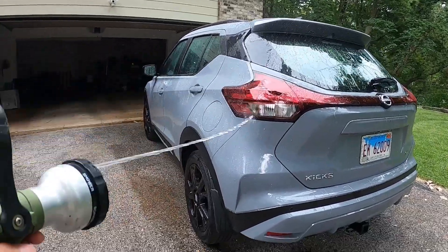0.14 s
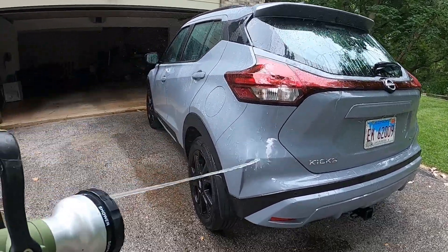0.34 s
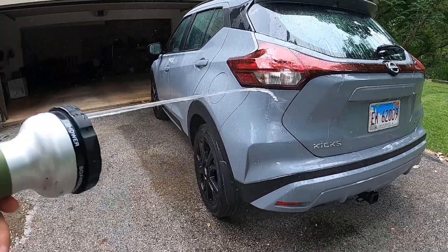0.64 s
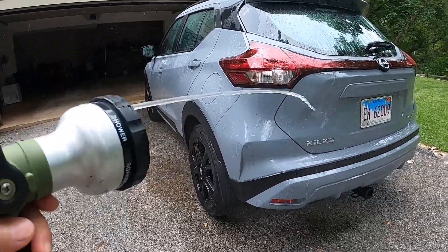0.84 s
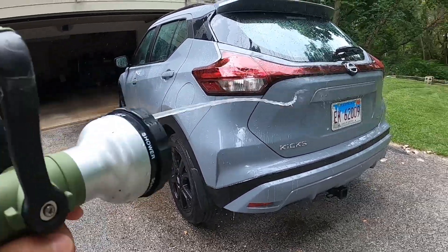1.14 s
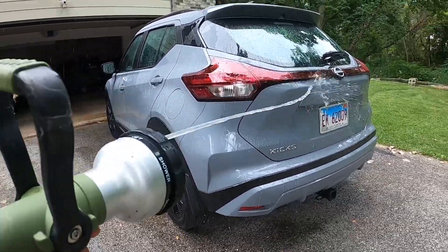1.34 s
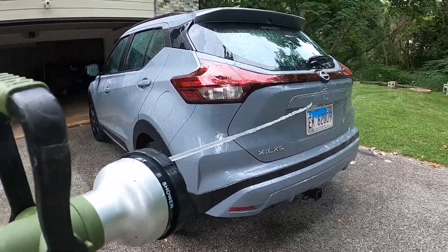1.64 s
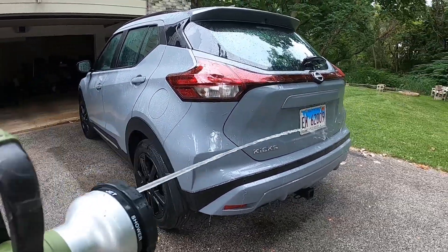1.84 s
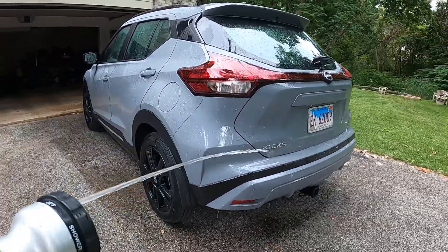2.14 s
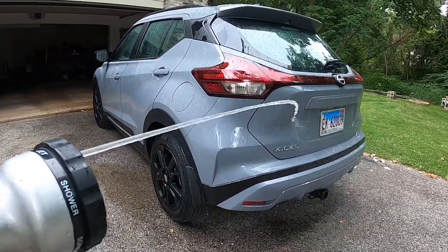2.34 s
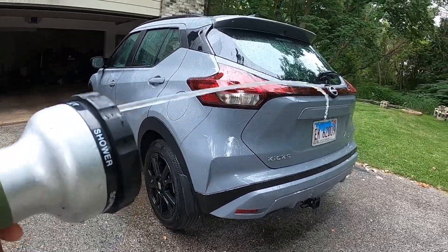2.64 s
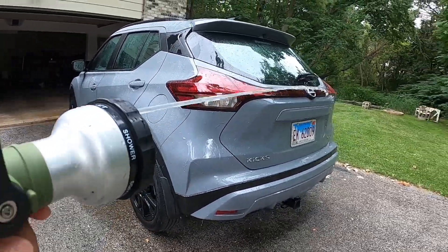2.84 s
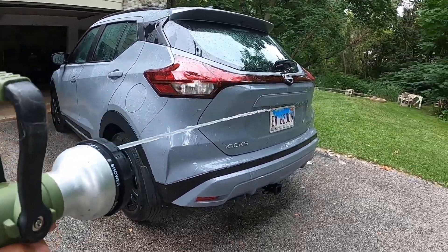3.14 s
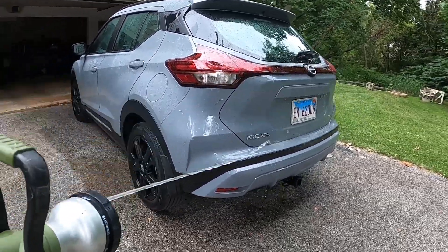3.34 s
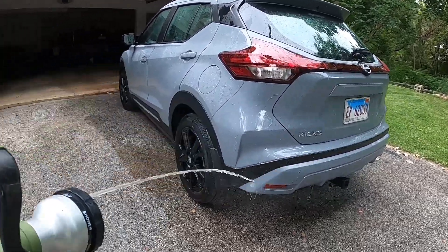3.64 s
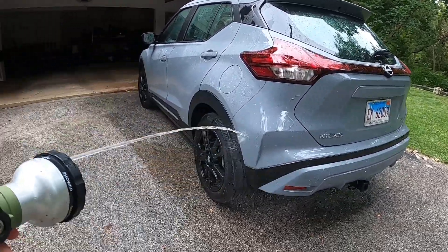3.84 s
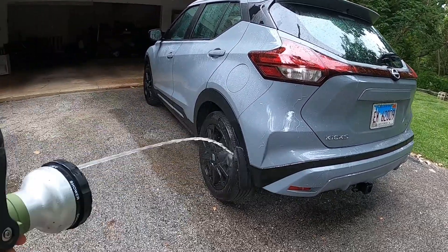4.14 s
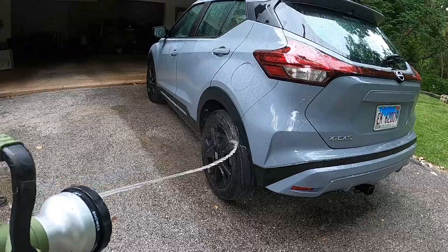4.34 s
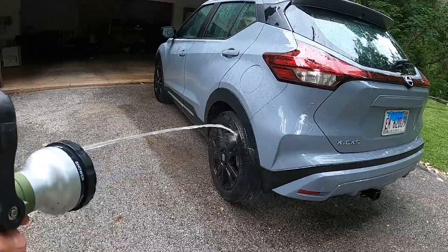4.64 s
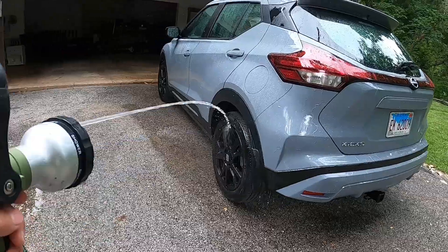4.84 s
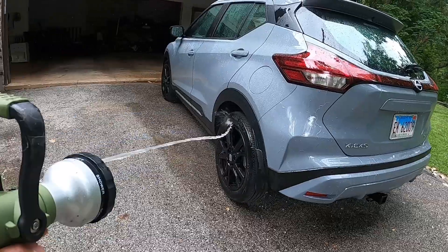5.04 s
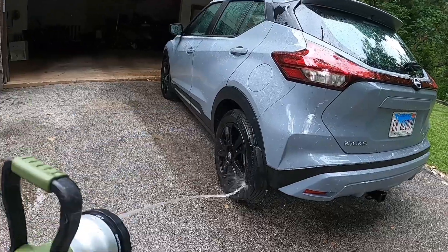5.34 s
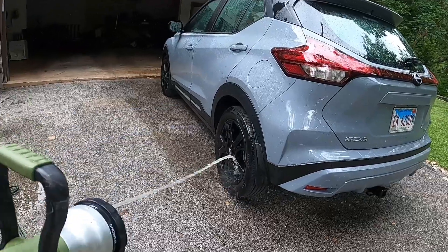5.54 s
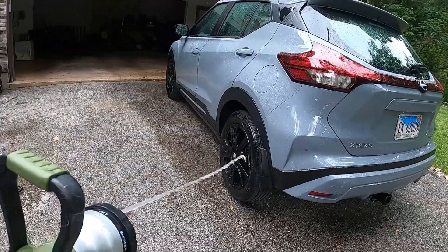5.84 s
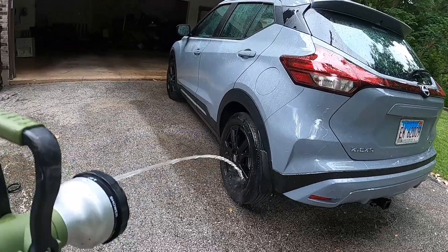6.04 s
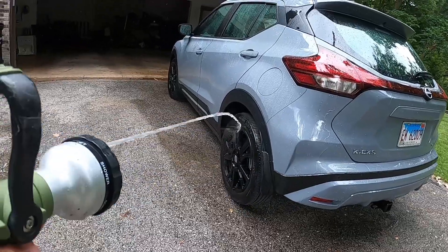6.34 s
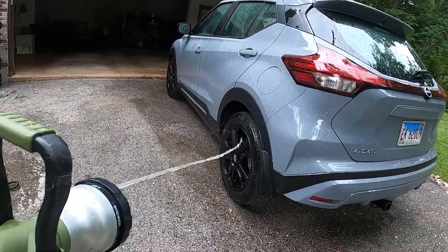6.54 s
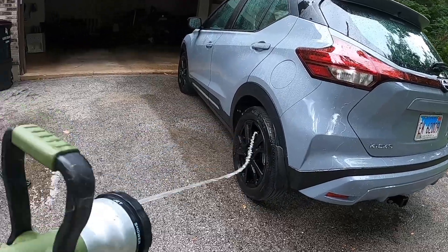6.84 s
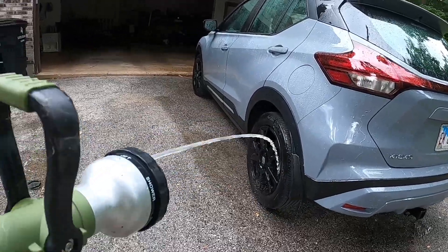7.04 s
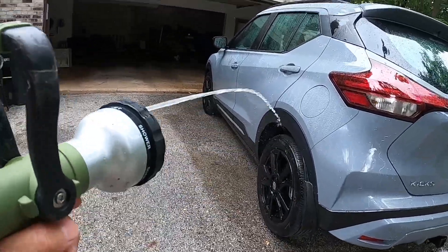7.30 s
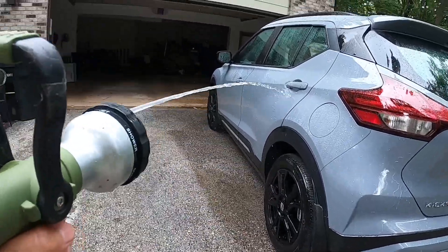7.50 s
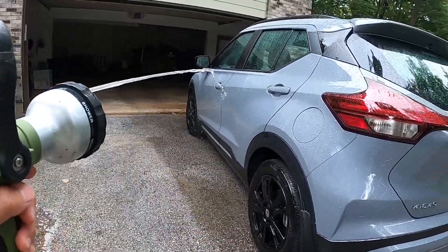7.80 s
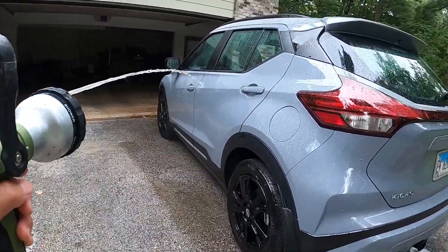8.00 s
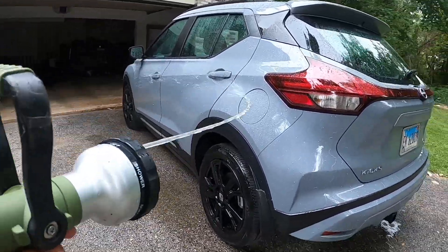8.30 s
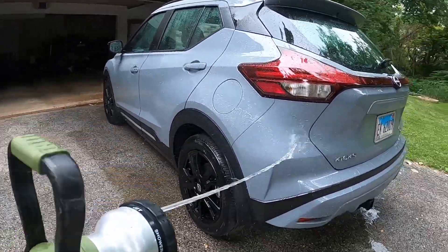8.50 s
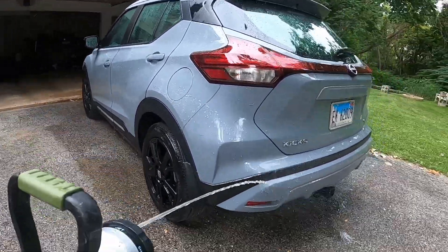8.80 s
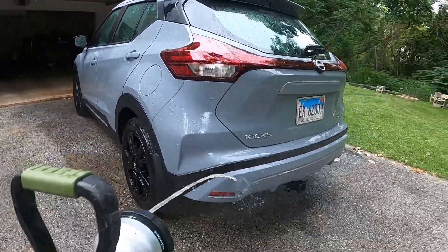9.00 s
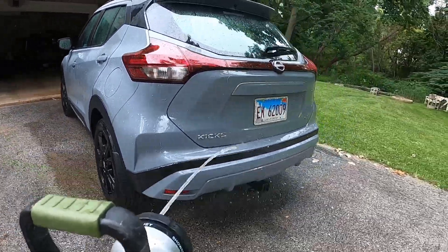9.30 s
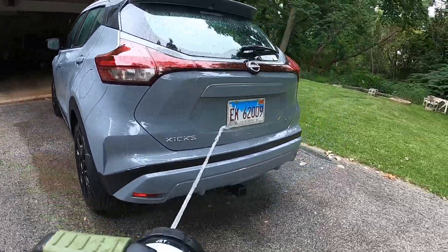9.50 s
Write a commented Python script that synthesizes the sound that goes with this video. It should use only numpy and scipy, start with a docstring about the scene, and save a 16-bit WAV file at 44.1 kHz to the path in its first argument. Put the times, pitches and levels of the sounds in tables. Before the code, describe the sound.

Close hose nozzle hisses steadily while water drums in short passes across car bodywork, then patters sharply on tyre and driveway.

```python
"""Hosing down a parked car

A thin hose jet sweeps over a parked car, a few metres from a camera's two microphone ports.
Random drop impacts ring the panel modes; the splash is a crackle plus single bursts echoed by the drive.
The nozzle hisses in its resonances, and shaped noise makes a low outdoor rumble underneath.
The camera's gain control ducks around loud peaks and creeps back up."""
import sys
import numpy as np
from scipy import signal
from scipy.fft import rfft, irfft, next_fast_len
from scipy.io import wavfile
from scipy.ndimage import uniform_filter1d, minimum_filter1d, map_coordinates

SR = 44100
rng = np.random.default_rng(int(sys.argv[2]) if len(sys.argv) > 2 else 0)


def output_pcm(signal):
    """Save a mono or channel-first signal as 16-bit PCM at the path in sys.argv[1].

    Samples are clipped to [-1, 1] before scaling.
    """
    pcm = np.clip(np.atleast_2d(signal).T, -1, 1) * 32767
    wavfile.write(sys.argv[1], SR, np.round(pcm).astype(np.int16))


N = 426006  # length in samples


def amp(db):
    """Decibels to a linear factor."""
    return 10 ** (np.asarray(db) / 20)


def unit(x):
    """Scale to rms 1."""
    return x / np.sqrt(np.mean(x ** 2) + 1e-20)


def along(points, hz):
    """Read (f/Hz, value) points on a log frequency axis."""
    f, v = np.transpose(points)
    return np.interp(np.log(hz + 1), np.log(f + 1), v)


def curves(rows):
    """One value per sample for each column after the time."""
    s, *cols = np.transpose(rows)
    t = np.arange(N) / SR
    return [np.interp(t, s, c) for c in cols]


def wobble(rate):
    """A smooth random curve, rate knots a second."""
    knots = rng.standard_normal(int(N * rate / SR) + 4)
    return map_coordinates(knots, [np.arange(N) * rate / SR])


def filtered(x, response):
    """Shape the spectrum of x by a (possibly complex) response of frequency."""
    m = next_fast_len(N + 8192)
    return irfft(rfft(x, m) * response(np.fft.rfftfreq(m, 1 / SR)), m)[..., :N]


def patter(per_s, scatter_db):
    """Random impacts, rms 1: two rows share moments and scattered strengths, each hit with its own factor."""
    strength = amp(scatter_db * rng.exponential(size=N))
    hit = (rng.random(N) < per_s / SR) * strength
    return unit(hit * rng.standard_normal((2, N)))


def patches(shape, bins, frames):
    """A random field of rms 1, smoothed over frequency bins and time frames."""
    over_bins = uniform_filter1d(rng.standard_normal(shape), size=bins, axis=0)
    return unit(uniform_filter1d(over_bins, size=frames, axis=1))


def patchy(x, depth_db):
    """Random gain in patches of several hundred Hz by some twenty ms."""
    z = signal.stft(x, nperseg=256)[2]
    gain = amp(depth_db * patches(z.shape[1:], bins=5, frames=8))
    return signal.istft(z * gain, nperseg=256)[1][:, :N]


# The jet crossing a panel: [start t/s, length t/s, soft modes level/dB, low modes level/dB,
# high modes level/dB, splash level/dB, swell from start to end level/dB, favoured pitch f/Hz]
PANEL_PASSES = [(0, 0.13, -30, -28, -27, -21.5, 7, 930), (0.146, 0.15, -30, -22.5, -21, -20, 0, 890),
                (0.331, 0.22, -20.5, -12, -6, -12.5, -1, 790), (0.578, 0.03, -18, -18, -8, -24, 2, 910),
                (0.616, 0.063, -24, -13, -7, -16.5, 1.5, 650),
                (0.707, 0.046, -20, -18, -4.5, -12.5, -2, 740), (0.78, 0.12, -23, -7.5, -6.5, -12, 1, 630),
                (0.931, 0.12, -24.5, -12, -8, -15, -3, 940), (1.079, 0.044, -25, -12, -6, -17, -3, 695),
                (1.13, 0.047, -33, -22, -10.5, -17.5, -7.5, 940),
                (1.213, 0.078, -32, -31, -24, -16, 6, 960), (1.327, 0.13, -33, -13.5, -9, -16, -6.5, 840),
                (1.545, 0.016, -32, -20, -15.5, -18, 9, 925),
                (1.622, 0.14, -27, -17.5, -19.5, -20.5, -1, 890),
                (1.73, 0.074, -25, -17.5, -13.5, -19.5, 2, 820),
                (1.859, 0.099, -36, -16, -17, -15.5, 11.5, 930),
                (1.995, 0.22, -21.5, -21, -19.5, -27, 0, 865),
                (2.183, 0.15, -24, -16.5, -9.5, -14.5, -1, 990),
                (2.388, 0.15, -23, -17, -13, -14.5, 4.5, 926),
                (2.599, 0.09, -23.5, -19, -20.5, -20.5, -4, 860),
                (2.727, 0.19, -27, -19.5, -22.5, -17.5, 0.5, 826),
                (3.194, 0.077, -24, -18, -10, -18, 1, 1020), (3.329, 0.12, -16, -12, -12, -12, 1, 840),
                (3.462, 0.18, -14.5, -11, -14, -18.5, -8.5, 860),
                (3.656, 0.26, -15.5, -16.5, -8.5, -10.5, 0.5, 1140),
                (3.919, 0.1, -17, -6, -9, -18.5, -1.5, 870), (4.047, 0.091, -19.5, -14, -10, -19, -6, 930),
                (4.283, 0.11, -35.5, -34, -18, -24, 2, 1900), (4.557, 0.031, -15, -24, -3, -16, 1, 1040),
                (4.6, 0.075, -12, -10, -2.5, -9, 2.5, 1140),
                (5.165, 0.057, -11.5, -23.5, -23, -21.5, 2, 1020),
                (7.507, 0.13, -27, -25, -24.5, -23, -7.5, 890),
                (7.638, 0.075, -41, -18.5, -21.5, -31.5, 3, 860),
                (7.785, 0.26, -20.5, -20.5, -23, -39, -2, 910),
                (8.126, 0.099, -23, -29, -27, -21.5, -9, 1070),
                (8.48, 0.047, -17, -11.5, -10, -13, -1, 1030), (8.532, 0.058, -17, -11, -9.5, -10, 5, 1660),
                (8.605, 0.08, -16, -11, -1.5, -8, -1, 940), (8.69, 0.043, -20, -7, -4.5, -14, -2, 630),
                (8.755, 0.059, -23, -14, -11.5, -19, 5, 960), (8.866, 0.11, -26, -20, -17.5, -14, -3, 950),
                (8.96, 0.12, -18.5, -18, -12.5, -12.5, 0, 980),
                (9.072, 0.16, -22, -14, -13.5, -12, -4.5, 1210),
                (9.268, 0.2, -18.5, -12, -17.5, -19, 6, 840), (9.466, 0.13, -16, -11, -16.5, -17, -5, 780),
                (9.628, 0.067, -17, -17, -15, -17, -9, 1015)]
# Splash on wheel and drive between passes: [t/s, level/dB]
SPRAY_LEVEL = [(0, -21.5), (1.5, -22), (3, -21.5), (4.2, -24), (4.5, -21.5), (4.8, -25), (6.5, -29),
               (7.3, -26), (8.4, -22), (9.66, -19)]
# Soft, low and high modes between passes, relative to that splash: [level/dB]
OFF_PANEL_LEVELS = [-7.5, -10, -12]
ATTACK_S, RELEASE_S = 0.012, 0.026  # the jet meeting and leaving a panel


def passes():
    """Levels (dB) of three mode groups and splash, and favoured pitch: each pass rises, holds and fades."""
    t = np.arange(0, N / SR, .002)
    start, length, *level_db, swell_db, spot_hz = np.transpose(PANEL_PASSES)[:, :, None]
    rise = np.clip(1 + (t - start) / ATTACK_S, 0, 1)
    fade = np.exp(-np.maximum(t - start - length, 0) / RELEASE_S)
    swell = amp(swell_db * np.clip((t - start) / length - .5, -.5, .5))
    shape = rise * fade * swell
    between_db = np.interp(t, *np.transpose(SPRAY_LEVEL)) + np.array([*OFF_PANEL_LEVELS, 0])[:, None]
    levels = []
    for on_db, off_db in zip(level_db, between_db):
        loudest = (shape * amp(on_db)).max(axis=0)
        levels.append(20 * np.log10(np.maximum(loudest, amp(off_db))))
    spot = spot_hz[shape.argmax(axis=0), 0]
    return curves(np.column_stack([t, *levels, spot]))


def drifting(x, depth_s):
    """Reading slightly ahead or behind bends the pitch up and down by a few percent."""
    at = np.arange(N) + depth_s * SR * (wobble(9) + 5 * wobble(2.5))
    return np.array([np.interp(at, np.arange(N), row) for row in x])


# Body panel resonances in soft, low and high groups: [f/Hz, width f/Hz, level/dB]
PANEL_MODES = [
    [(167, 146, 0.5), (230.5, 102, 2)],
    [(294.7, 44, -2.5), (348.2, 50, -0.5), (397.5, 44, 1), (458.6, 110, 1.5)],
    [(624.4, 106, 1.5), (744.4, 117, -2), (916.3, 93, -0.5), (1048.5, 107, -1), (1201, 113, -3.5),
     (1373, 84, -2.5), (1645, 250, 0), (1870, 230, -3), (2570, 350, -10)],
]


def panels():
    """Drops drive the panel modes; as the jet wanders each swells, fades and is detuned by the water film."""
    drive = patter(2500, scatter_db=-1.0) * amp(0.29 * wobble(45))
    *levels_db, _, spot_hz = passes()
    out = 0
    # only the high group loses modes far from the struck spot's pitch
    for level_db, modes, focus_db in zip(levels_db, PANEL_MODES, [0, 0, 11]):
        ring, power = 0, 0
        for hz, width_hz, db in modes:
            # two equal resonators in series
            mode = unit(filtered(drive, lambda f: (
                1j * f * width_hz / (hz * hz - f * f + 1j * f * width_hz)) ** 2))
            off_spot = np.tanh(3 * np.log2(hz / spot_hz) ** 2)
            share = amp(db + 3.9 * wobble(18) - focus_db * off_spot)
            ring = ring + share * drifting(mode, depth_s=0.000908)
            power = power + share ** 2
        out = out + amp(level_db) * ring / np.sqrt(power)
    return out


def tinted(x, spot_hz):
    """The struck spot lifts its own pitch; passing hollows in the water film colour narrow bands."""
    hz, t, z = signal.stft(x, SR, nperseg=1024)
    spot_hz = np.interp(t * SR, np.arange(N), spot_hz)
    lift_db = 6 * np.exp(-(np.log2((hz[:, None] + 1) / spot_hz) / 0.063) ** 2)
    hollows_db = 3.14 * patches(z.shape[1:], bins=3, frames=7)
    return signal.istft(z * amp(lift_db + hollows_db), SR, nperseg=1024)[1][:, :N]


def pops(count, loud_db, jet_db):
    """Rows (t/s, level/dB, f/Hz) of smaller drops at random, following the splash level."""
    u = rng.random((count, 3))
    level_db = jet_db[(u[:, 0] * N).astype(int)] + loud_db - 4 * np.log(u[:, 1])
    return np.column_stack([u[:, 0] * N / SR, np.minimum(level_db, -6), 1900 * 4.02 ** u[:, 2]])


def drop_burst(db, hz):
    """One bursting drop: a few cycles of tone with a short puff of noise, mostly in the shared row."""
    t = np.arange(400) / SR
    tone = 1.25 * np.sin(2 * np.pi * hz * t) * amp(-60 * t * hz / 19)  # down 60 dB in 19 cycles
    puff = uniform_filter1d(rng.standard_normal(len(t)), size=3) * amp(-60 * t / 0.003)
    return amp(db) * (tone + 0.42 * puff) * [[1], [rng.normal(0, 0.18)]]


# Big drops bursting: [t/s, level/dB, f/Hz]
BIG_DROPS = [(0.1813, -1, 3100), (0.4304, -1, 1980), (0.565, 3, 4500), (0.787, 0, 3480), (1.1508, -6, 2980),
             (1.281, -2, 3540), (1.9444, 5, 4060), (3.3407, -4, 4160), (3.6691, 1.5, 2640),
             (3.8976, 9.5, 3980), (4.1926, -2.5, 3300), (4.1967, 4, 3180), (4.3897, -1, 3620),
             (4.483, -3, 3460), (4.502, -5, 3430), (4.518, -1.5, 2950), (4.54, -3, 2930), (4.579, 7, 3150),
             (4.8098, 2, 4000), (4.939, -3, 4480), (5.0018, 7.5, 5000), (5.0862, -3, 5400),
             (5.263, 3, 4170), (5.4565, -1.5, 2730), (5.4694, -3.5, 4380), (5.6903, 1.5, 4580),
             (5.958, 8.5, 4200), (6.1123, -1, 3720), (6.1528, 3, 5140), (6.1794, -2, 5490),
             (6.2011, 1, 3960), (6.2045, -10, 3330), (6.3135, 5, 3500), (6.3463, 8.5, 6500),
             (6.485, -0.5, 4200), (6.677, -4, 4000), (6.6984, 5.5, 6500), (6.7675, 0, 4180),
             (6.91, 0.5, 5220), (6.926, 2.5, 4540), (7.272, 2, 7900), (7.2859, 1.5, 4400), (7.392, 7, 6100),
             (7.9915, 9.5, 2560), (8.622, -5, 2960), (8.466, 0, 4500), (8.8716, 5, 3370),
             (8.9568, 0.5, 3770), (9.0816, -1, 3200), (9.24, 5, 6040), (9.3984, 7, 5070),
             (9.4912, -1.5, 4330)]
# Spectrum of the crackle: [f/Hz, level/dB per Hz]
SPLASH_SPECTRUM = [(300, -6), (900, 8.5), (1700, 11), (3200, 8), (6000, -2), (9500, -16.5), (13000, -50)]
# A stronger splash gains body: extra dB per dB above this level, under this pitch
FULLER, FULL_DB, BODY_HZ = 0.41, -22.5, 1450


def splash():
    """The jet breaks into a crackle of droplets in short spurts; larger drops burst singly and echo."""
    spurts = amp(1.1 * wobble(7) + 1.4 * wobble(40) + 0.59 * wobble(150))
    droplets = patter(5000, scatter_db=1.0) * spurts
    jet_db, spot_hz = passes()[3:]
    coloured = tinted(patchy(droplets, depth_db=2.5), spot_hz)
    crackle = unit(filtered(coloured, lambda hz: amp(along(SPLASH_SPECTRUM, hz))))
    body = filtered(crackle, lambda hz: 1 / (1 + (hz / BODY_HZ) ** 6))
    crackle = crackle + (amp(FULLER * (jet_db - FULL_DB)) - 1) * body
    bursts = np.zeros((2, N + SR))
    for s, db, hz in np.vstack([BIG_DROPS, pops(count=550, loud_db=3.5, jet_db=jet_db)]):
        burst = drop_burst(db, hz)
        bursts[:, round(s * SR):][:, :burst.shape[1]] += burst
    echo_samples = round(0.0038 * SR)  # off the drive
    bounce = 0.37 * np.pad(bursts, ((0, 0), (echo_samples, 0)))
    return amp(jet_db) * crackle + bursts[:, :N] + bounce[:, :N]


# The hiss, louder as the nozzle nears the camera: [t/s, level/dB]
NOZZLE_LEVEL = [(0, -20), (.6, -21), (1.3, -20.5), (2, -13.5), (2.6, -16.5), (2.85, -14), (3.1, -11.5),
                (3.35, -12), (3.7, -18), (4.55, -14.5), (4.9, -15), (5.5, -18), (5.94, -16), (6.6, -15.5),
                (7.3, -16), (8.35, -17), (9, -18), (9.66, -17.5)]
# Nozzle resonances: [f/Hz, level/dB per Hz]
HISS_SPECTRUM = [(700, -18.5), (2600, -7.5), (3300, -6.5), (3900, -3.5), (4050, 1), (4450, 1.5), (4600, -2),
                 (4950, -0.5), (5150, -4), (6500, -5.5), (7600, -2), (8300, -9), (10700, -14.5),
                 (12100, -14.5), (13500, -22), (15600, -45)]
# Changing colour of the hiss: [t/s, top octave level/dB, main resonance level/dB]
HISS_COLOUR = [(0, 3.5, -0.5), (1.2, 7, 3), (2.4, 2, -2.5), (2.75, 5, 3.5), (3.1, 4, 2.5), (3.6, 4, 1),
               (6, 4, -0.5), (8, 3, 1), (8.7, 8.5, 3.5), (9.66, 8.5, 2.5)]
MAIN_HZ, MAIN_OCTAVES = 4520, 0.4  # main resonance: centre and half width


def nozzle():
    """Fine turbulent hiss in the nozzle's resonances, its top and main resonance rising and sinking."""
    noise = patchy(patter(14000, scatter_db=1.5), depth_db=1.47) * amp(0.63 * wobble(25))
    hiss = unit(filtered(noise, lambda hz: amp(along(HISS_SPECTRUM, hz))))
    top = filtered(hiss, lambda hz: 1 / (1 + (9500 / (hz + 1)) ** 8))
    main = filtered(hiss, lambda hz: np.exp(-(np.log2((hz + 1) / MAIN_HZ) / MAIN_OCTAVES) ** 4))
    top_db, main_db = curves(HISS_COLOUR)
    coloured = hiss + (amp(top_db) - 1) * top + (amp(main_db) - 1) * main
    return amp(curves(NOZZLE_LEVEL)[0]) * coloured


# Uneven level of the rumble, with some sudden swells: [t/s, level/dB]
RUMBLE_SWELL = [(0.0, -24), (0.78, -36.5), (2.85, -22), (3.84, -28.5), (5.45, -27.5), (6.24, -32),
                (6.6, -24.5), (7.48, -32), (7.53, -22.5), (8.9, -29.5), (9.02, -19), (9.36, -27),
                (9.66, -19.5)]
# Spectrum of the rumble: [f/Hz, level/dB per Hz]
RUMBLE_SPECTRUM = [(15, -34), (28, -9), (55, -1.5), (85, -8.5), (118, -6.5), (250, -18.5), (500, -38),
                   (1200, -66)]


def rumble():
    """Low outdoor rumble: bass-heavy noise that swells unevenly."""
    white = rng.standard_normal((2, N))
    noise = unit(filtered(white, lambda hz: amp(along(RUMBLE_SPECTRUM, hz))))
    return amp(curves(RUMBLE_SWELL)[0] + 3 * wobble(5.6)) * noise


# Left-right likeness: [f/Hz, correlation]
PORT_LIKENESS = [(30, .82), (80, .9), (150, .995), (500, .97), (1300, .92), (3000, .8), (7000, .5),
                 (14000, .45)]
# Left minus right: [f/Hz, level/dB]
PORT_LEAN = [(60, 0), (300, 1), (700, -1.4), (2800, 1.5), (8000, -2), (13000, -3)]
# Phase by which the left port leads: [f/Hz, phase/rad]
PORT_LEAD = [(150, 0.3), (350, -0.37), (1400, -0.48), (3000, -0.62), (6000, -0.82), (10000, -0.43)]


def ports(pair):
    """Two microphone ports: a shared part plus an opposed part, leaning and shifted in phase."""
    def blend(hz):
        turn = np.arccos(np.clip(along(PORT_LIKENESS, hz), -1, 1)) / 2
        return np.array([np.cos(turn), np.sin(turn)])

    side = np.array([[1], [-1]])

    def place(hz):
        return amp(side * along(PORT_LEAN, hz) / 2) * np.exp(.5j * side * along(PORT_LEAD, hz))

    shared, opposed = filtered(pair, blend)
    return filtered(shared + side * opposed, place)


def scene():
    """Everything reaches the camera's two ports."""
    return ports(panels() + splash() + nozzle() + rumble())


def gain_needed(x):
    """Gain that keeps the louder channel under the ceiling at each sample."""
    return np.minimum(1, CEILING / (np.abs(x).max(axis=0) + 1e-9))


# The gain control heeds the bass less: [f/Hz, level/dB]
SENSING_WEIGHT = [(1000, -2.5), (3000, 0)]
CEILING, HOLD_S, TOP_HZ = .98, .055, 15680  # full scale is 1; TOP_HZ is the band limit
LINGER, RECOVER_DB_PER_S = 0.69, 9.5  # share of a duck that outlasts the hold, and how fast it returns


def record(dry):
    """Gain control ducks ahead of peaks, holds, jumps partly back and creeps; then limiter and band limit."""
    sensed = filtered(dry, lambda hz: amp(along(SENSING_WEIGHT, hz)))
    need_db = 20 * np.log10(gain_needed(sensed))
    hold = round(HOLD_S * SR)
    # the shifted window looks slightly ahead and a whole hold back
    held_db = minimum_filter1d(need_db, size=hold + 33, origin=hold // 2 - 17)
    ramp_db = RECOVER_DB_PER_S * np.arange(N) / SR
    creep_db = ramp_db + np.minimum.accumulate(LINGER * held_db - ramp_db)
    ducked = dry * uniform_filter1d(amp(np.minimum(held_db, creep_db)), size=33)
    limit = minimum_filter1d(gain_needed(ducked), size=65)
    limited = ducked * uniform_filter1d(limit, size=33)
    return filtered(limited, lambda hz: hz < TOP_HZ)


dry = scene()
out = record(dry)
output_pcm(out)
```